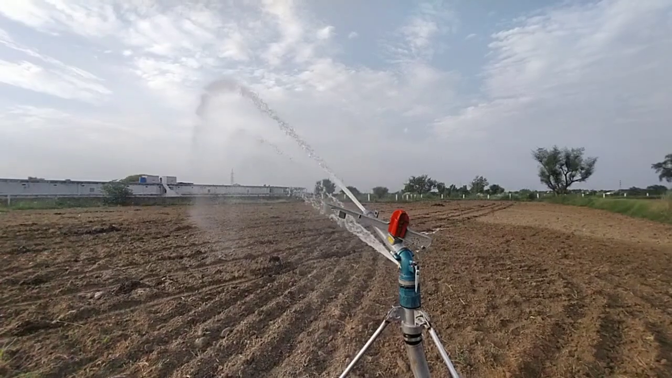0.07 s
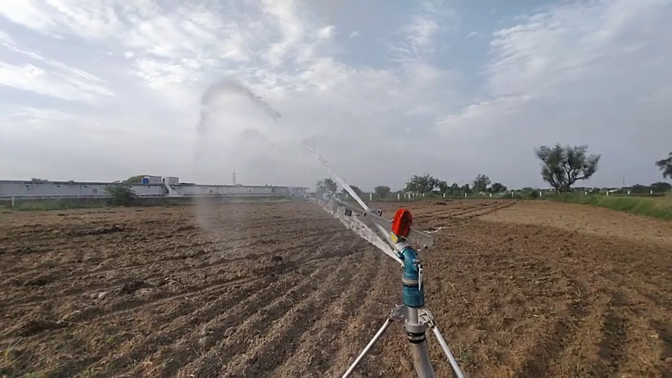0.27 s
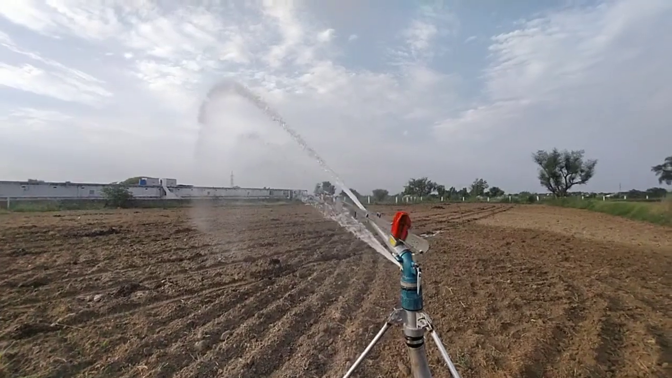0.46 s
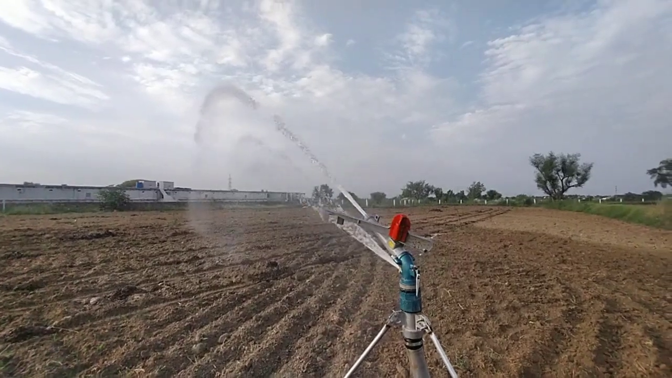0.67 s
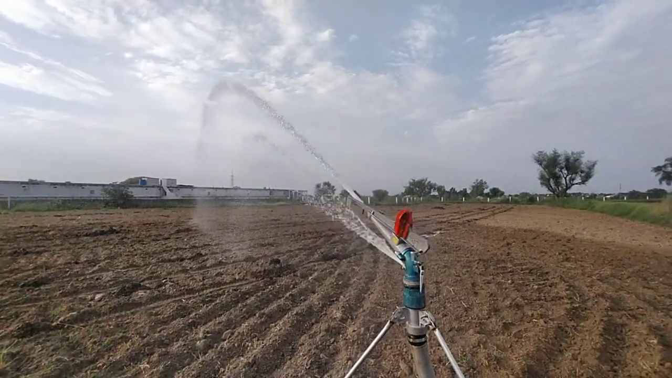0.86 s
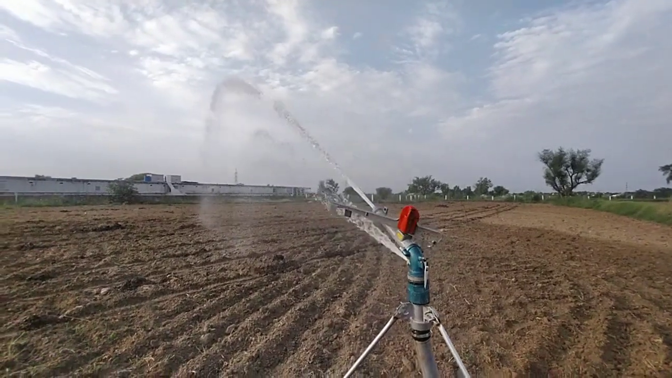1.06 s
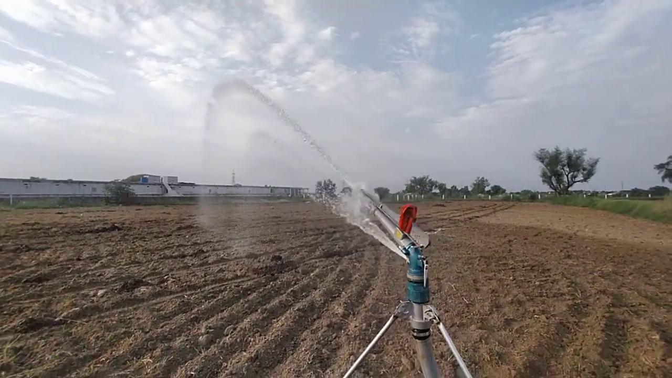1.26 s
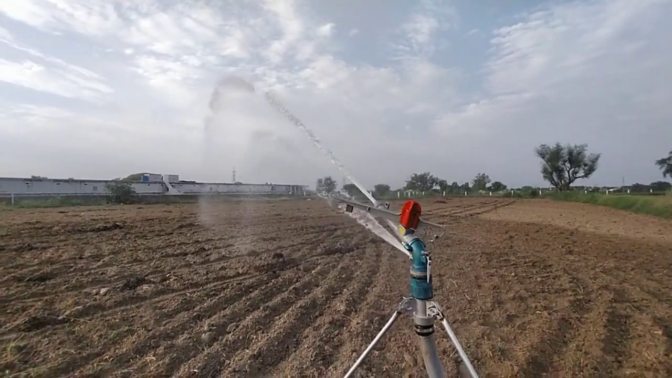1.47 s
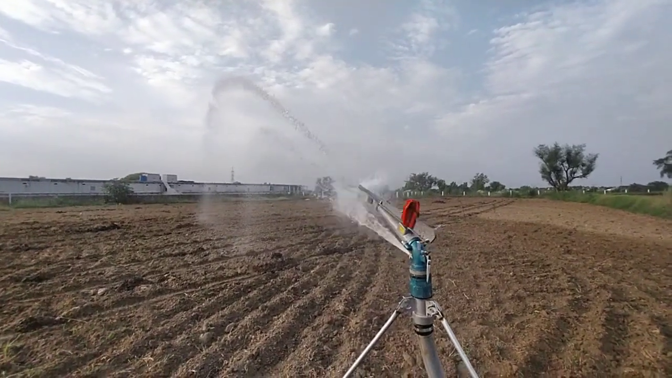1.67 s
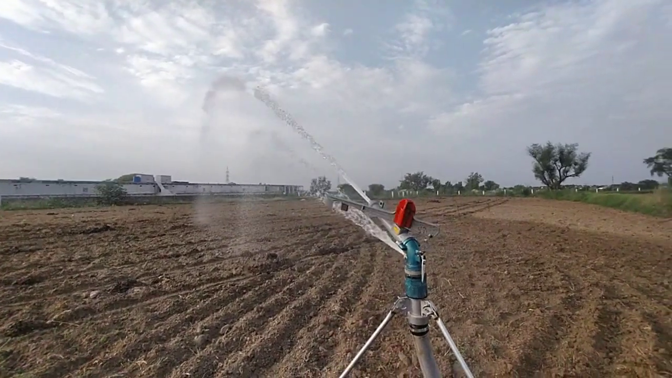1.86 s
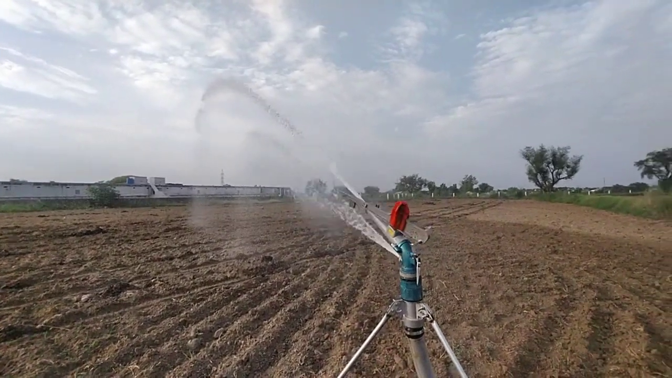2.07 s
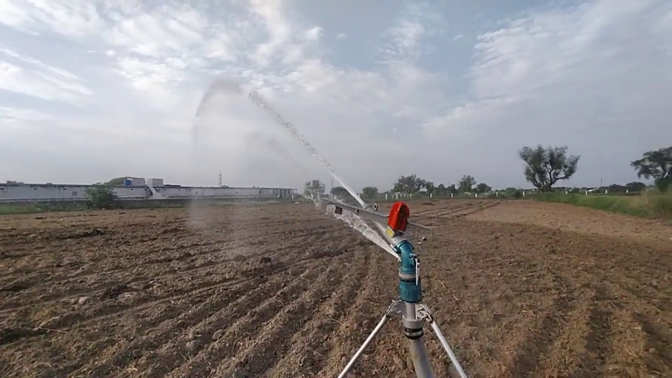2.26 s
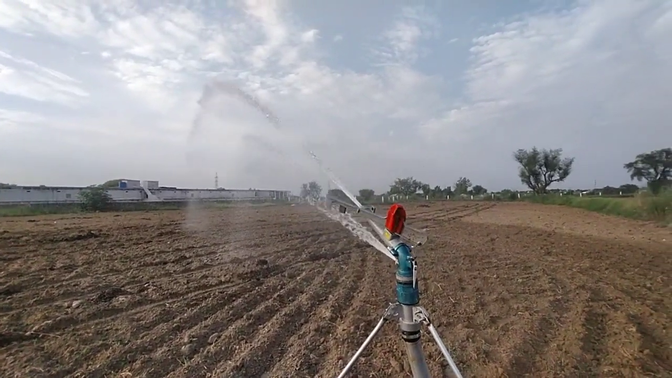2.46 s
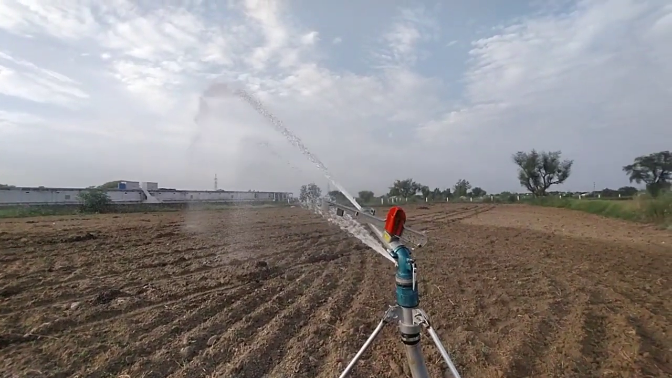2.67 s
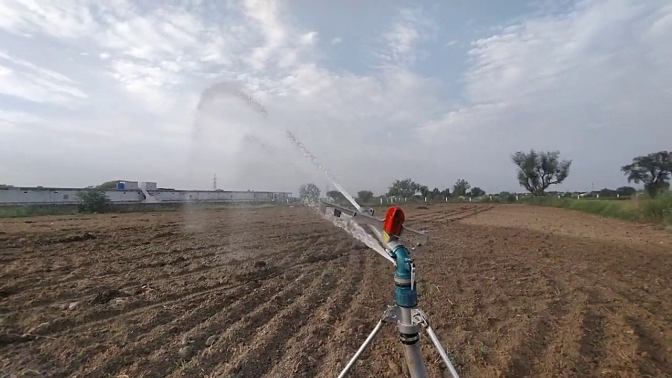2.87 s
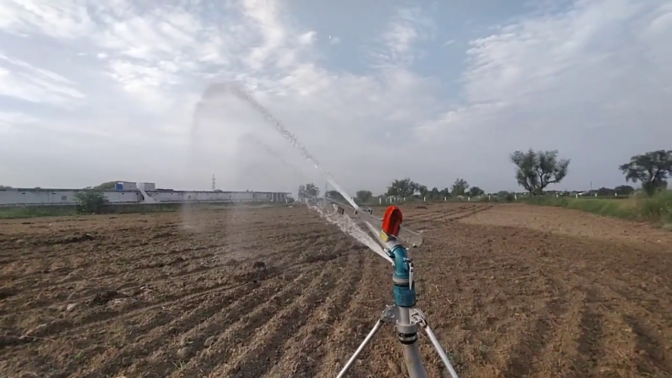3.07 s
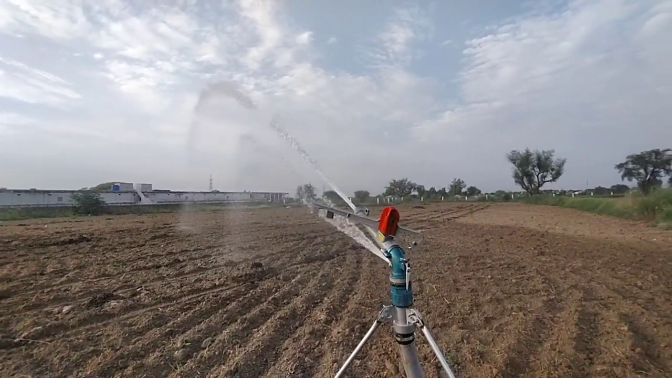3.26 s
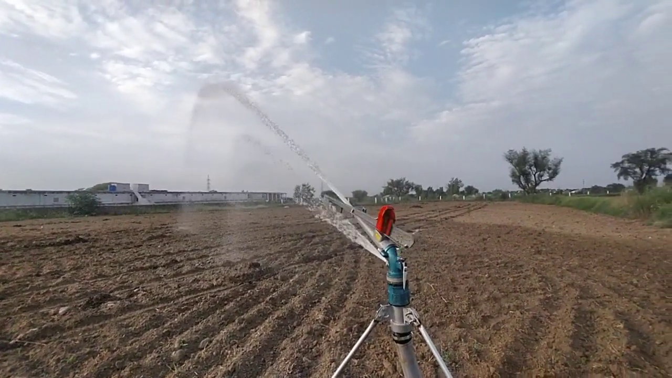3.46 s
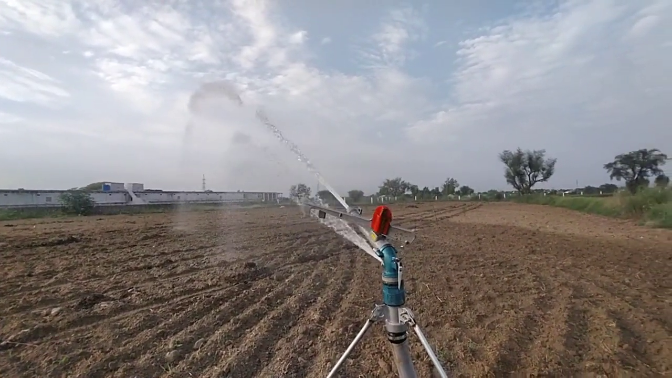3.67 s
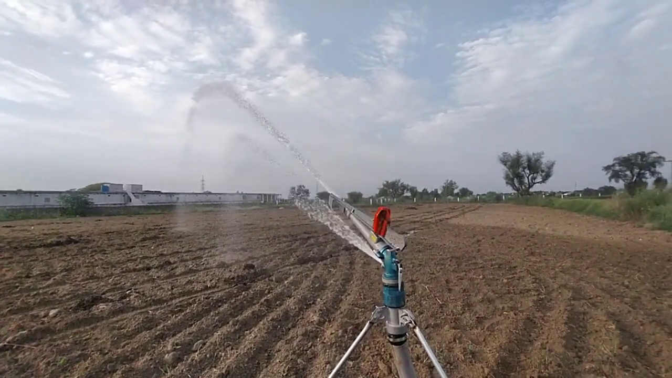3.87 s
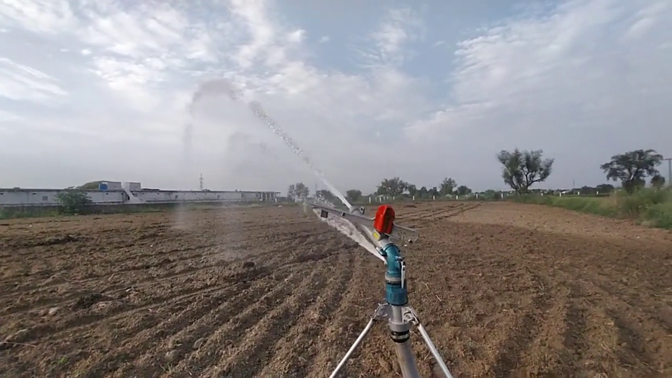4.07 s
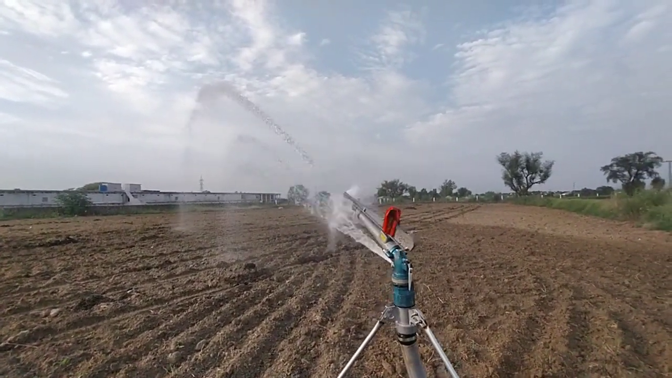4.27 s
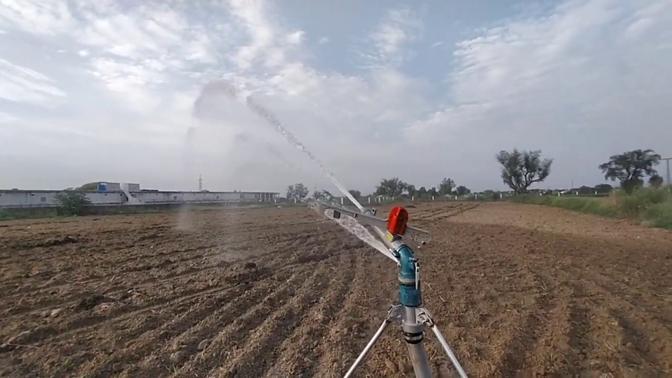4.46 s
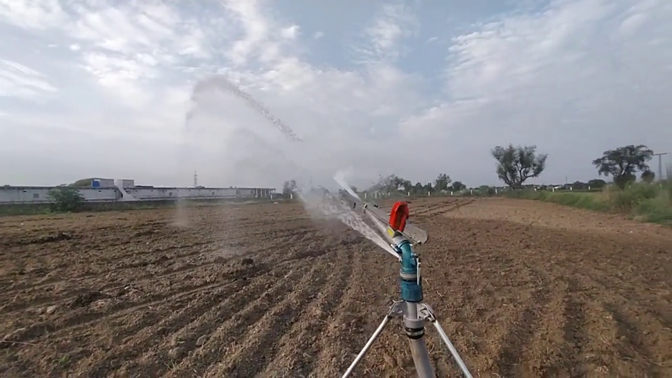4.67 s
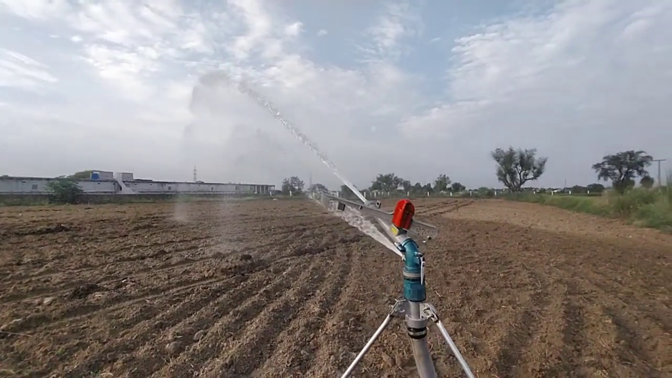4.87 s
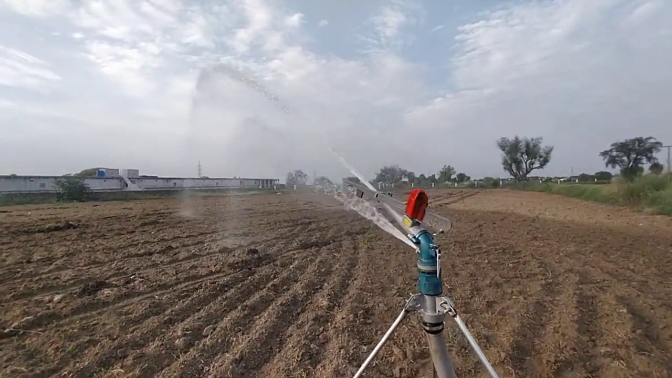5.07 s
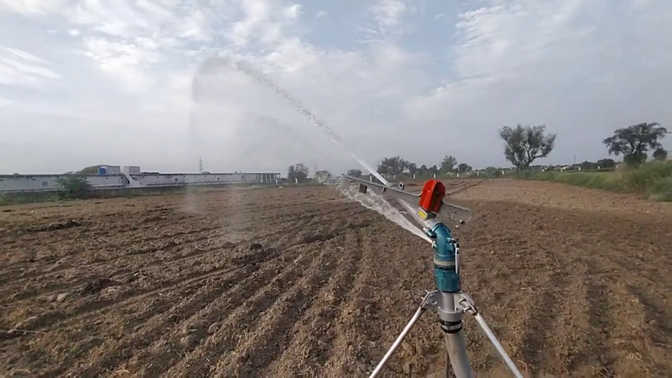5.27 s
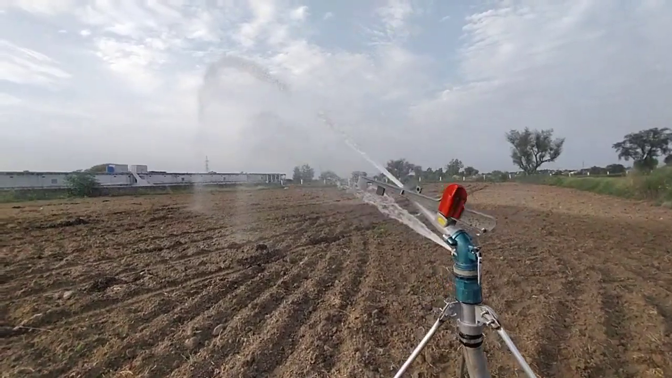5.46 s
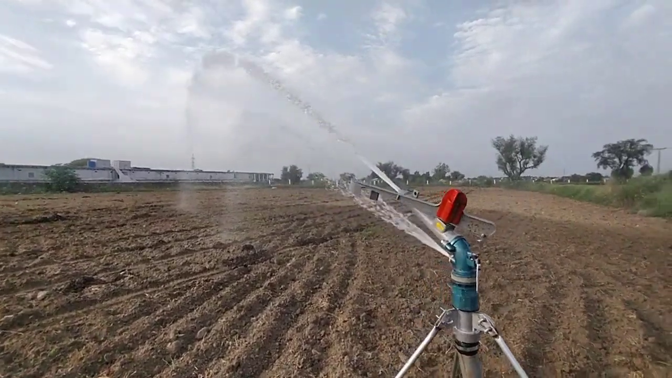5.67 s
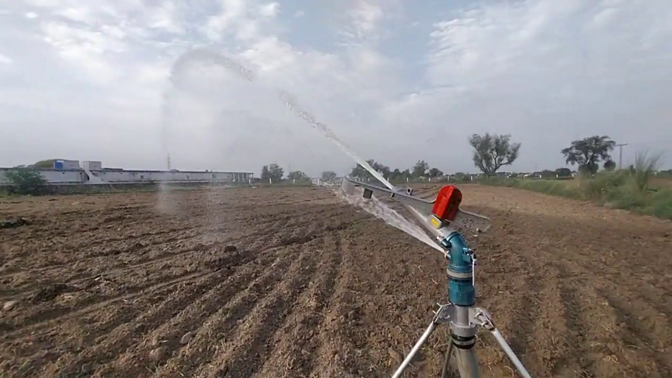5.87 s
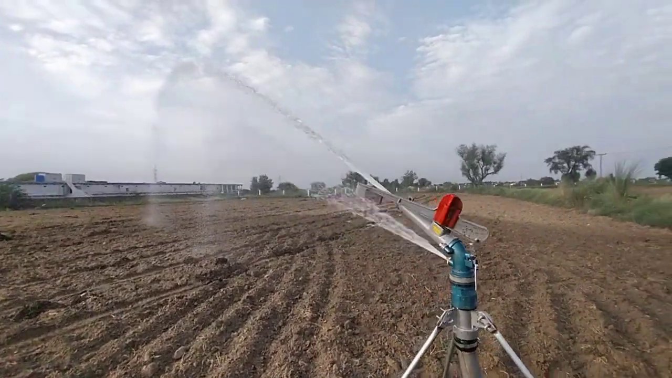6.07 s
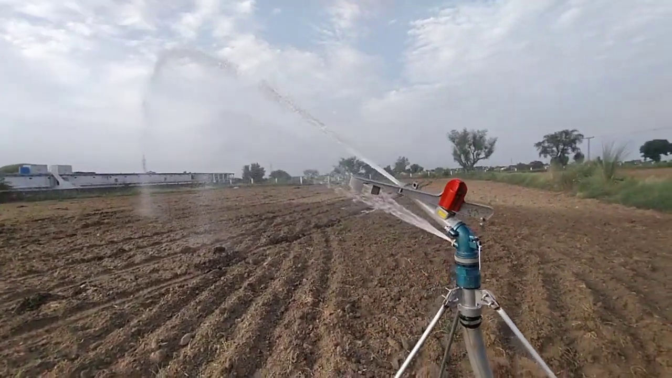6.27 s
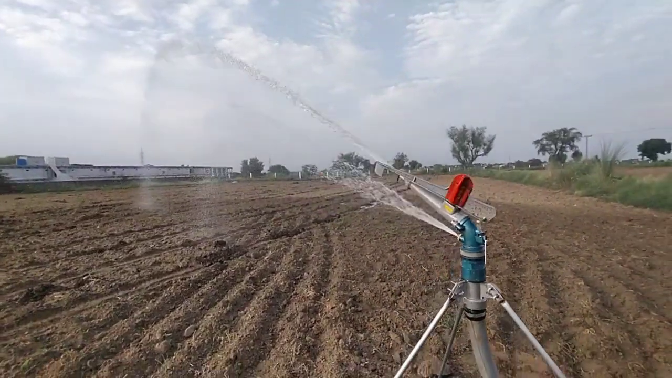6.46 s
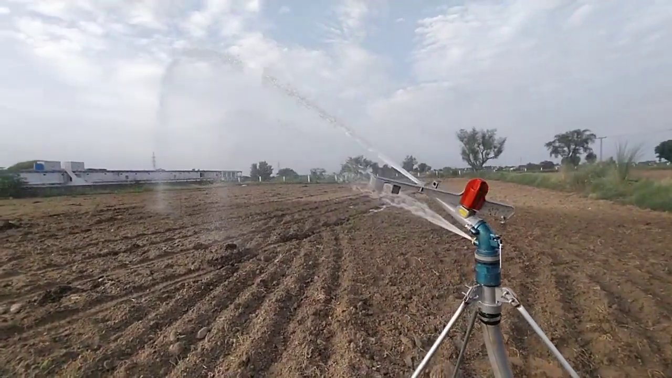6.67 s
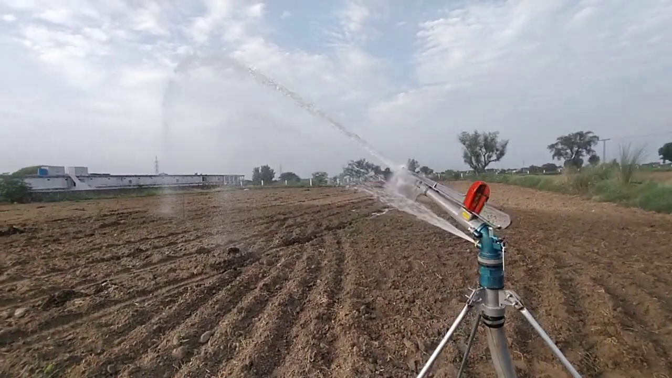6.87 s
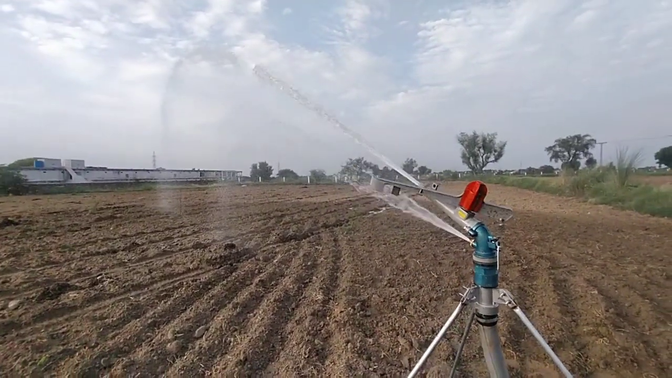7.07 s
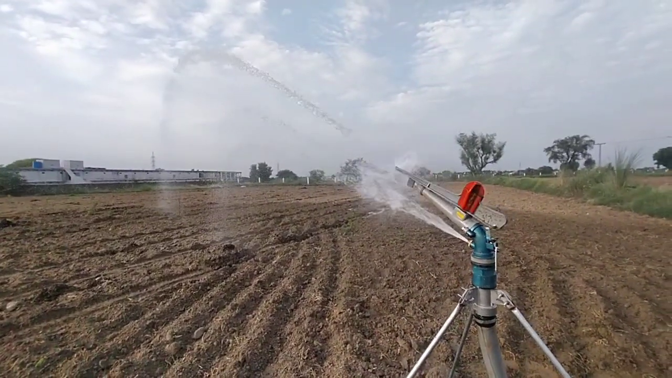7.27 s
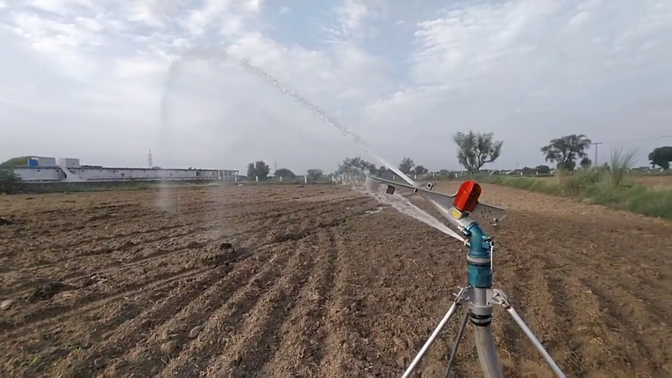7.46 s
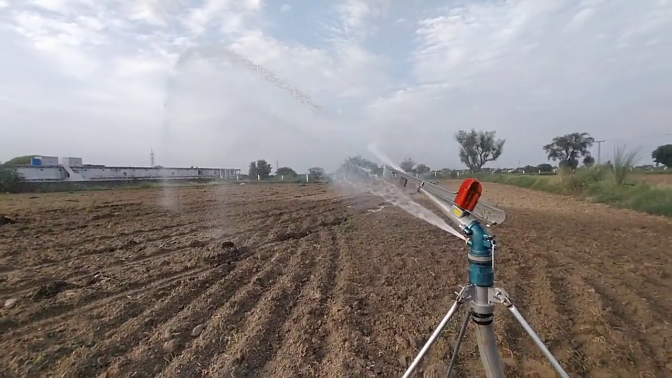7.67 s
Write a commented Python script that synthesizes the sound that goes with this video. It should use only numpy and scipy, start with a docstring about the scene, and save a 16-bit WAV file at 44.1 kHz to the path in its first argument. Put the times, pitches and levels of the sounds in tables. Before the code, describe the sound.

An impact sprinkler close by splashes and slaps in a fast, even rhythm over hissing spray, with wind bumping the microphone.

```python
"""Impact sprinkler in a field

A sprinkler turns slowly, close by. Nearly three times a second the spoon-shaped tip of its arm dips
into the jet: a splash, a slap and a patter of thrown water. The arm rattles and often rings as it
swings back. The jet hisses, water rains on the soil, a far pump hums and wind bumps the microphone."""
import sys
import numpy as np
from scipy import signal
from scipy.fft import rfft, irfft
from scipy.io import wavfile

SR = 44100
rng = np.random.default_rng(int(sys.argv[2]) if len(sys.argv) > 2 else 0)


def unload_audio(sound):
    """Save the sound as a 16-bit wav file, at the path given as the first command line argument."""
    columns = np.transpose(np.atleast_2d(sound))
    # keep every value between -1 and 1, then stretch to whole-number steps
    steps = np.round(np.clip(columns, -1, 1) * 32767)
    wavfile.write(sys.argv[1], SR, steps.astype(np.int16))


N = 340893
TIME = np.arange(N) / SR
LEAD_S = .01  # each stroke's sound gets this head start, so it has room to swell
STROKE_TIME = np.arange(SR // 3) / SR - LEAD_S

# the arm cuts the jet: (time [s], base splash level [dB], base slap level [dB])
STROKES = [(0.6616, -33, -31.5), (1.0337, -29, -29.5), (1.4121, -27.5, -28), (1.7854, -26.5, -27),
           (2.1571, -25.5, -27), (2.527, -26, -27.5), (2.9, -24.5, -28), (3.2766, -25, -26),
           (3.6514, -24.5, -27), (4.0252, -25.5, -26), (4.3945, -23.5, -28.5), (4.764, -22.5, -28),
           (5.1369, -23, -26.5), (5.5114, -22.5, -26.5), (5.885, -21.5, -26.5), (6.259, -22.6, -26.5),
           (6.6328, -22, -24.5), (7.0054, -22.5, -24.5), (7.3777, -21.5, -24.5)]
# the steady water swells as the head turns: (time [s], hiss level [dB], base falling water level [dB])
FLOW = [(0.75, -52, -56), (2.34, -46, -52), (3.15, -47, -50.5), (3.75, -47.5, -53), (4.12, -46, -52.5),
        (5.96, -43.5, -50.5), (7.7, -43.5, -52.5)]
# tones the sprinkler head boosts or cuts: (pitch [Hz], width [Hz], boost before turn [dB], after [dB])
HEAD = [(413, 58, 12, 14.5), (853, 38, 3.5, 4), (996, 150, -3.5, 1.5), (1111, 49, -9.5, -14),
        (1406, 70, 8.5, 7.5), (1628, 35, 9.5, -7), (1860, 180, 0, 4.5), (1940, 120, 4, 5),
        (2225, 105, 8, -2), (3130, 59, 4.5, -3), (3270, 79, 3, 6.5), (3724, 105, 4.5, 7), (3820, 48, 2, -6),
        (4360, 10, -2, 11), (4960, 48, -3, -4), (5800, 55, -3, 10), (6458, 45, -1, 8), (6850, 45, -6, 11)]
# tones the nozzle tube boosts or cuts: (pitch [Hz], width [Hz], boost [dB])
TUBE = [(860, 60, 1.5), (1400, 70, 5), (1662, 70, 6.5), (2050, 76, -5.5), (2335, 37, 3), (2580, 90, -0.5),
        (2600, 71, -3), (2995, 84, -9.5), (3035, 60, 9.5), (3170, 65, -8.5), (3070, 49, 5),
        (3370, 75, -3.5), (3600, 120, -1)]
# tones of the wet spoon: (pitch [Hz], width [Hz], boost [dB])
SPOON = [(821, 27, 8), (1673, 130, 4.5), (1930, 42, -1), (2240, 44, 4), (2570, 38, 11.5), (2880, 58, -2),
         (3190, 72, 16), (3760, 36, 15), (4305, 120, 22), (9750, 200, 13)]
# tone colour of pattering drops: (frequency [Hz], relative level [dB])
PATTER = [(300, -12.5), (600, -17), (830, -2), (1100, -13.5), (1600, 2), (2000, 2), (2400, -4.5),
          (3000, -7.5), (4500, -8.5), (7000, -25), (14000, -33)]


def gain_of(db):
    """Turns decibels into a number to multiply by."""
    return 10 ** (np.asarray(db) / 20)


def evened(x):
    """Scales a sound to an average (rms) size of 1."""
    return x / np.sqrt(np.mean(x ** 2) + 1e-20)


def at_level(x, db, seconds):
    """Gives a burst the energy of that many seconds at that level."""
    return x * gain_of(db) * np.sqrt(seconds * SR / (np.sum(x ** 2) + 1e-20))


def add(mix, start_s, sound):
    """Mixes a sound in at a given time."""
    part = mix[round(start_s * SR):][:len(sound)]
    part += sound[:len(part)]


def coloured(x, spectrum, peaks=(), size=4096):
    """Filters a sound with a broad tone colour plus narrow peaks and dips."""
    hz = np.fft.rfftfreq(size, 1 / SR)
    points_hz, points_db = np.transpose(spectrum)
    level = np.interp(np.log(hz + 1), np.log(points_hz + 1), points_db)
    for centre, width, boost in peaks:
        level += boost / (1 + (2 * (hz - centre) / width) ** 2)
    # make the filter ring only after a hit, never before it
    cepstrum = irfft(np.log(gain_of(np.maximum(level, -100))))
    cepstrum[1:size // 2] *= 2
    cepstrum[size // 2 + 1:] = 0
    response = irfft(np.exp(rfft(cepstrum)))[:size // 2]
    return signal.oaconvolve(x, response)[:len(x)]


def drift(count, hz):
    """A smooth random wobble, up to about that many times a second."""
    smoothing = np.exp(-(np.fft.rfftfreq(count, 1 / SR) / hz) ** 2)
    return evened(irfft(rfft(rng.standard_normal(count)) * smoothing, count))


def water(count, clump_db, clump_hz):
    """Noise of countless tiny impacts that arrive in clumps."""
    return evened(rng.standard_normal(count) * gain_of(clump_db * drift(count, clump_hz)))


def drops(count, per_s, spread_db):
    """Separate drops: mostly small, a few large."""
    size = gain_of(spread_db * np.minimum(rng.exponential(1, count), 3))
    return evened(size * rng.choice([-1, 1], count) * (rng.random(count) < per_s / SR))


def ramp(t, seconds):
    """Goes from 0 to 1 in that time, and stays."""
    return np.clip(t / seconds, 0, 1)


def blow(t, rise_s, fall_s, tail_db, tail_s):
    """Loudness shape that peaks at t = 0, falls quickly and leaves a weaker tail."""
    after, tail = np.maximum(t, 0), gain_of(tail_db)
    swell = np.exp(-(np.minimum(t, 0) / rise_s) ** 2)
    return swell * ((1 - tail) * np.exp(-(after / fall_s) ** 2) + tail * np.exp(-after / tail_s))


def turned(when):
    """How far the head has come round, from 0 to 1."""
    # the turn: (start [s], end [s])
    turn_s = [2.9, 6.34]
    return np.interp(when, turn_s, [0, 1])


def head_tones(when):
    """As the head turns, different tones of it stand out."""
    return [(hz, width, before + turned(when) * (after - before)) for hz, width, before, after in HEAD]


def wind():
    """Wind rumbles and single swirls bump the microphone; a few small ticks sound too."""
    # tone colour of the rumble: (frequency [Hz], relative level [dB])
    rumble = [(10, -14.5), (25, -3.5), (45, -7), (70, -10.5), (110, -21), (170, -25.5), (300, -42.5),
              (700, -50)]
    # rise and fall of the wind: (time [s], level [dB])
    gusts = [(.5, -57), (1.5, -52), (2.3, -53), (3.3, -46.5), (4.2, -45), (5, -49), (5.3, -45.5),
             (6.15, -43), (6.5, -49), (7.7, -54)]
    # pushes of air, and much shorter ticks: (time [s], peak level [dB], rise time [s])
    bumps = [(1.027, -28, 0.0032), (4.121, -25.5, 0.0038), (4.139, -31, 0.003), (5.306, -32.5, 0.0032),
             (5.333, -35.5, 0.0035), (5.711, -32, 0.0019), (6.11, -28.5, 0.0034), (6.149, -21, 0.0028),
             (6.159, -33, 0.0046), (6.214, -30, 0.0014)]
    ticks = [(0.56, -21.5, 0.0002), (0.636, -33, 0.00018), (4.295, -33, 0.00021), (5.248, -29, 0.00019),
             (5.373, -35, 0.00055)]
    strength = gain_of(np.interp(TIME, *np.transpose(gusts)))
    out = evened(coloured(water(N, 1.7, 15), rumble)) * strength
    for when, db, rise_s in bumps + ticks:
        age = np.arange(SR // 10) / SR / rise_s
        add(out, when, gain_of(db) * age * np.exp(1 - age))
    return out


def pump(pitch_hz=126.6, wander_hz=0.43, level_db=-54.5, waver_db=0.4):
    """A far pump hums one low tone that the breeze barely sways."""
    cycles = np.cumsum(pitch_hz + wander_hz * drift(N, 1.45)) / SR
    hum = np.sin(2 * np.pi * cycles) * gain_of(waver_db * drift(N, 5))
    return evened(hum) * gain_of(level_db)


def falling_water(boost_db=2.5):
    """The jet's water rains on the soil."""
    # tone colour of water on soil: (frequency [Hz], relative level [dB])
    soil = [(150, 2.5), (220, -1.5), (330, -4.5), (500, -8.5), (700, -3), (850, -3), (1100, -2.5),
            (1400, -2.5), (1700, -3.5), (1930, -2.5), (2260, -2.5), (2950, -6.5), (3400, -1), (5000, -25)]
    times, _, levels = np.transpose(FLOW)
    rain = water(N, 1.2, 100) + .25 * drops(N, 120, 1)
    return evened(coloured(rain, soil, TUBE)) * gain_of(np.interp(TIME, times, levels) + boost_db)


def jet(mist_db=-18, mist_db_per_s=1.75, mist_hidden_db=-14):
    """The jet sputters out of the nozzle, and its fine mist grows louder."""
    # tone colours of the jet and its mist: (frequency [Hz], relative level [dB])
    jet_colour = [(1290, -22.5), (2200, -8.5), (2870, -2), (3020, -6.5), (3500, -1.5), (3770, -0.5),
                  (4640, 4), (5670, -3), (7900, -16.5), (9020, -19.5), (10700, -14.5), (12200, -27.5),
                  (14600, -42), (15600, -38), (16000, -47)]
    mist_colour = [(3500, -34), (5500, 7.5), (6600, 4.5), (7600, 1.5), (9000, -6), (10200, -1.5),
                   (11500, -12), (12800, -7), (15500, -13.5)]
    # the mist fades in: (start [s], end [s])
    mist_in_s = [3.5, 4.5]
    times, levels, _ = np.transpose(FLOW)
    hiss_db = np.interp(TIME, times, levels)
    growth_db = mist_db_per_s * TIME + np.interp(TIME, mist_in_s, [mist_hidden_db, 0])
    sputter = gain_of(.86 * drift(N, 58) + .5 * drift(N, 3))
    spit = water(N, 3.8, 1000) + gain_of(-8) * drops(N, 160, 5)
    hiss = evened(coloured(sputter * spit, jet_colour, TUBE))
    mist = evened(coloured(sputter * water(N, 3.1, 900), mist_colour))
    return (hiss + mist * gain_of(mist_db + growth_db)) * gain_of(hiss_db)


def knocks(hold_s=.025, linger=.15, clack_s=.0048, scatter_s=.003, scatter_db=2.5):
    """The arm rings briefly on its stop, then the ring drops away quickly; its rattles mostly clack."""
    # the arm swings back onto its stop: (time [s], base ring level [dB])
    returns = [(0.761, -51), (1.132, -49), (1.537, -40), (1.9096, -40), (2.2712, -41), (2.324, -47),
               (2.651, -38.5), (3.366, -41), (3.397, -34), (3.752, -47), (4.1486, -30), (4.488, -42),
               (4.864, -34.5), (4.89, -34.5), (5.225, -38.5), (5.257, -35.5), (5.5946, -39), (5.9506, -38),
               (6.3287, -45), (6.672, -29.5), (7.047, -35), (7.476, -42)]
    # tones of the arm: (pitch [Hz], relative level [dB], base time to fade 60 dB [s])
    arm_tones = [(3280, -22, .15), (3849, -14, .12), (4400, 5, 0.098), (4412, -4, 0.1), (5905, -21, .12),
                 (7574, -27, .1), (10670, -25, .08)]
    # the loose arm rattles on its pivot: (time after a stroke [s], level against the base slap [dB])
    rattles = [(.052, -17), (.099, -22), (.124, -18)]
    t = np.arange(SR // 6) / SR
    ring = sum(gain_of(db - 60 * t / fade_s) * np.sin(2 * np.pi * hz * t) for hz, db, fade_s in arm_tones)
    ring_shape = (1 - np.exp(-t / .0013)) * (linger + 1 / (1 + (t / hold_s) ** 6))
    # each hit: (time [s], ring level [dB], clack level [dB])
    hits = [(when, db - 1, .57 * db - 19) for when, db in returns]
    for when, _, slap_db in STROKES:
        for delay_s, offset_db in rattles:
            late, harder = rng.standard_normal(2)
            clack_db = slap_db + offset_db + scatter_db * harder
            hits.append((when + delay_s + scatter_s * late, clack_db - 12, clack_db))
    out = np.zeros(N)
    for when, ring_db, clack_db in hits:
        burst = water(len(t), 6.6, 570) * np.exp(-t / clack_s)
        add(out, when, at_level(ring * ring_shape, ring_db, .029))
        add(out, when, at_level(coloured(burst, PATTER, SPOON[:6]), clack_db, .0073))
    return out


def patter(db, rise_s=.016, last_s=.13, sag_db_per_s=64, fade_db_per_s=220):
    """Thrown water patters on the spoon in blobs: it builds up, sags and dies away."""
    t = STROKE_TIME
    fade = gain_of(-sag_db_per_s * t - fade_db_per_s * np.maximum(t - last_s, 0))
    blobs = water(len(t), 6.5, 110) + .5 * drops(len(t), 170, 3.5)
    thrown = ramp(t, rise_s) ** 4 * fade * blobs
    return at_level(coloured(thrown, PATTER, SPOON), db - 16.5, .1)


def slap(when, db, delay_s=.0081, scatter_s=.0005, ping_hz=1480, ping_s=.0028):
    """The full jet hits the spoon: a wet slap with a short ping inside and a hollow thud at its start."""
    # tone colours of the slap and the thud: (frequency [Hz], relative level [dB])
    slap_colour = [(80, -11), (200, -10.5), (320, -28), (500, -20.5), (900, -3.5), (1110, -3.5), (1260, -4),
                   (1480, 4), (1680, -0.5), (2000, -9.5), (2400, -4.5), (3000, -14), (5000, -7),
                   (8000, -48)]
    thud_colour = [(350, -55.5), (520, -21), (620, 1.5), (720, -9), (820, 5), (960, 7.5), (1110, -14),
                   (1400, -40.5)]
    t = STROKE_TIME - delay_s - scatter_s * rng.standard_normal()
    higher = np.interp(when, [5.9, 7.2], [1, 1.16])  # the spoon sounds higher from the side
    raised_colour = [(hz * higher, level) for hz, level in slap_colour]
    pitch = ping_hz * higher * rng.uniform(.838, 1.2)
    ping = np.sin(2 * np.pi * (pitch * STROKE_TIME + rng.random())) * np.exp(-(t / ping_s) ** 2)
    wet = blow(t, rise_s=.0069, fall_s=.011, tail_db=-9.5, tail_s=.028) * water(len(t), 2.8, 600)
    thud = blow(t + .0024, rise_s=.004, fall_s=.0012, tail_db=-11, tail_s=.026) * water(len(t), 1, 410)
    return (at_level(ping, db - 12.5, .052)
            + at_level(coloured(wet, raised_colour, head_tones(when)), db - 2, .035)
            + at_level(coloured(thud, thud_colour, head_tones(0)), db - 11.5, .022))


def splash(when, db, rise_s=.0034, hold_s=.019, fade_db_per_s=350, in_jet_s=.038):
    """The spoon shatters the jet into drops and a fine spray that grows as the head turns."""
    # tone colours of the splash and its spray: (frequency [Hz], relative level [dB])
    splash_colour = [(60, -35), (200, -8), (330, -20), (500, -36), (800, -11), (1100, -7.5), (1600, -18.5),
                     (2400, -3), (2950, -7.5), (3800, 0.5), (4700, 4.5), (5500, 0.5), (6500, -14),
                     (9000, -23)]
    spray_colour = [(3000, -33), (5500, 7.5), (6500, 6), (7500, 3.5), (9000, -3), (10300, 2.5),
                    (11800, -12), (14300, -29), (15800, -45)]
    t, count = STROKE_TIME, len(STROKE_TIME)
    fade_db = -fade_db_per_s * np.maximum(t - hold_s, 0)
    leave_db = -8.5 * ramp(t - in_jet_s, .0064)  # the spoon leaves the jet
    shatter = ramp(t + rise_s / 2, rise_s) * gain_of(fade_db + leave_db + 2 * drift(count, 460))
    crackle = shatter * (water(count, 1.8, 3000) + .5 * drops(count, 3000, 3))
    fizz = shatter * water(count, 1.8, 3000)
    spray_db = db - 11.5 + 3.5 * turned(when) ** 2
    return (at_level(coloured(crackle, splash_colour, head_tones(when)), db + .5, .027)
            + at_level(coloured(fizz, spray_colour), spray_db, .035))


def strokes():
    """Each time, the spoon breaks the jet, takes its full blow and throws water aside."""
    out = np.zeros(N)
    for when, splash_db, slap_db in STROKES:
        add(out, when - LEAD_S, splash(when, splash_db) + slap(when, slap_db) + patter(slap_db))
    return out


def scene():
    """Open ground with no walls; the sources simply mix."""
    return (strokes() + knocks() + jet() + falling_water() + pump() + wind())[None]


def record(dry, start_s=.505, ceiling=.86, top_hz=15650):
    """Half a second of silence, then the sound, with loud peaks rounded and the highest treble cut."""
    opened = dry * ramp(TIME - start_s, .003)
    rounded = opened / (1 + (opened / ceiling) ** 4) ** .25
    treble_cut = signal.firwin(301, top_hz, window=("kaiser", 9), fs=SR)
    return signal.oaconvolve(rounded, treble_cut[None], "same")


dry = scene()
out = record(dry)
unload_audio(out)
```